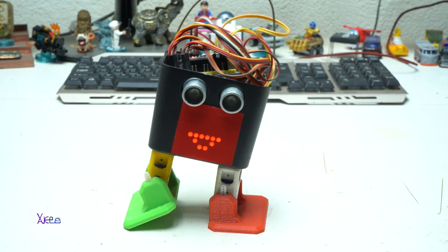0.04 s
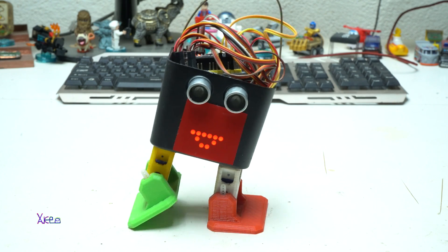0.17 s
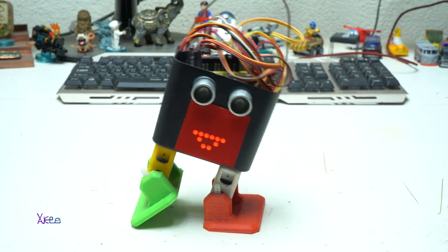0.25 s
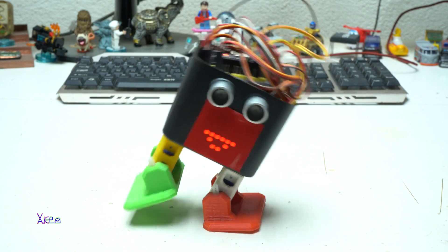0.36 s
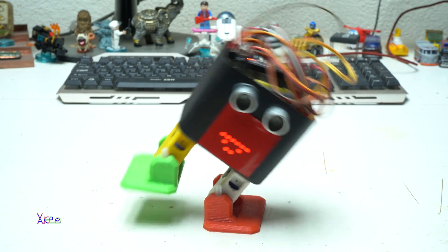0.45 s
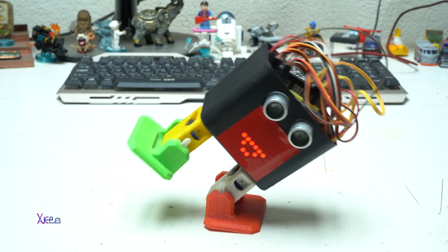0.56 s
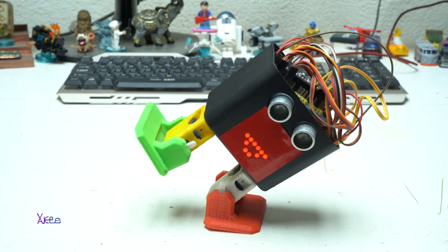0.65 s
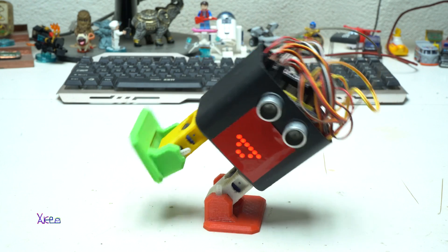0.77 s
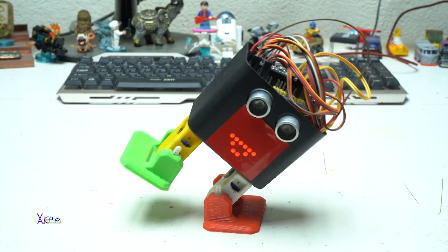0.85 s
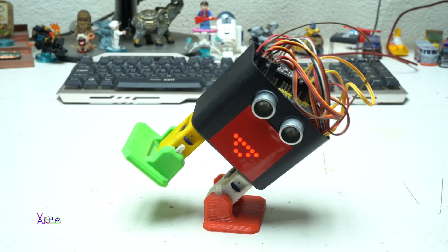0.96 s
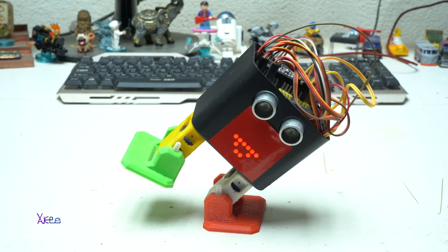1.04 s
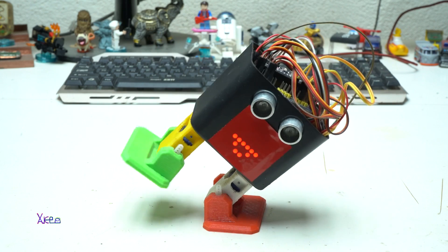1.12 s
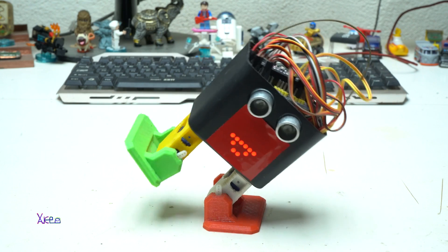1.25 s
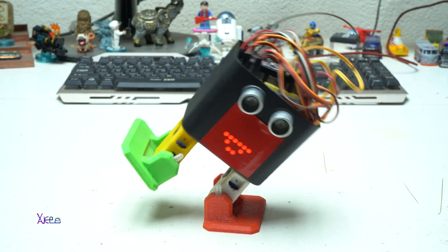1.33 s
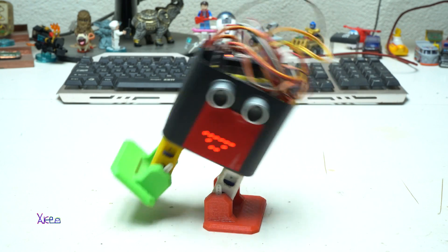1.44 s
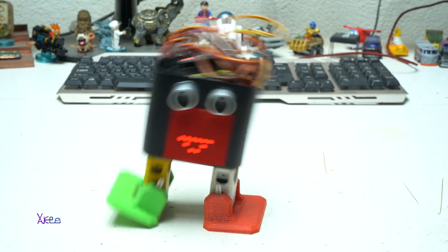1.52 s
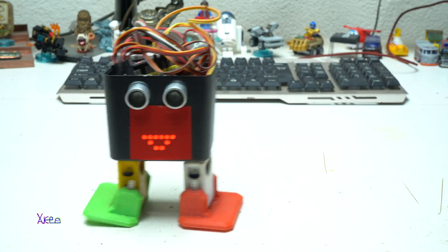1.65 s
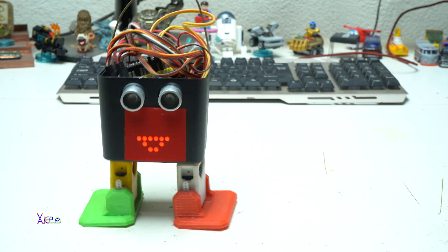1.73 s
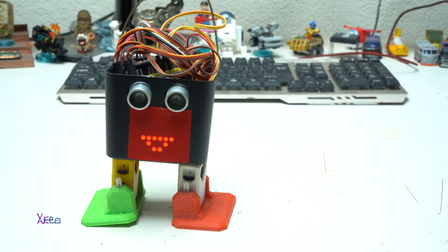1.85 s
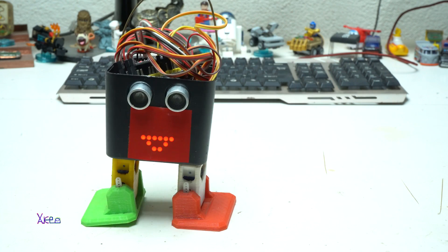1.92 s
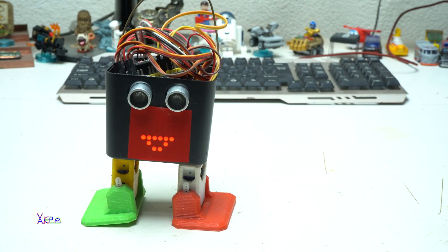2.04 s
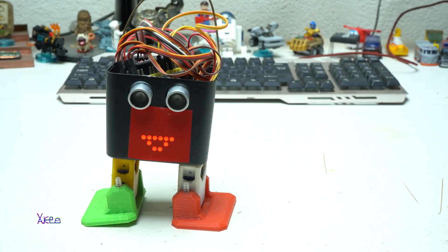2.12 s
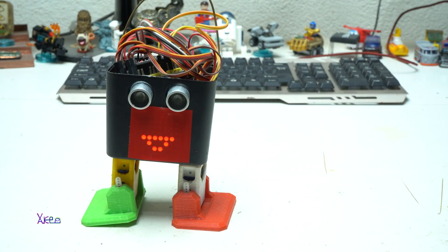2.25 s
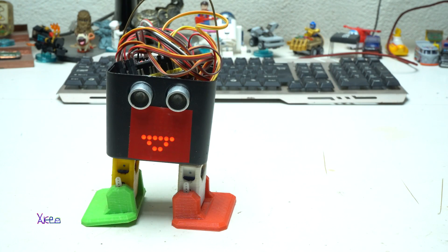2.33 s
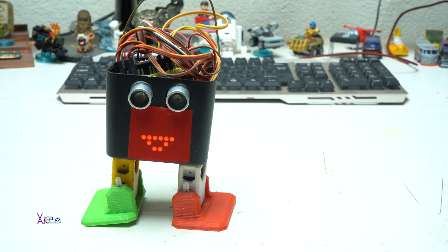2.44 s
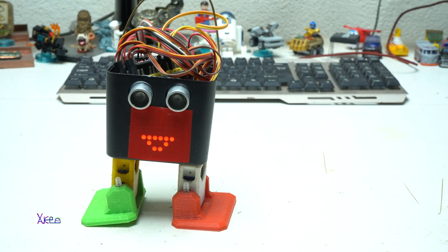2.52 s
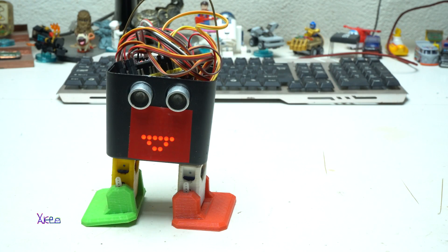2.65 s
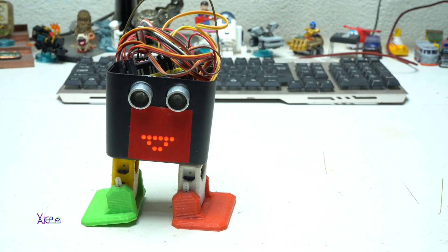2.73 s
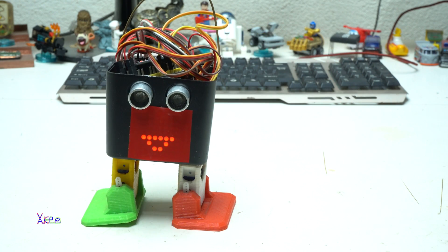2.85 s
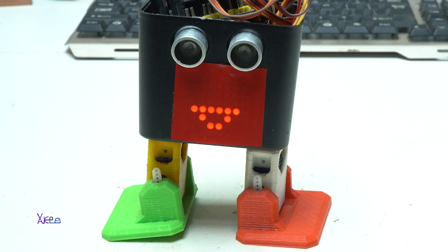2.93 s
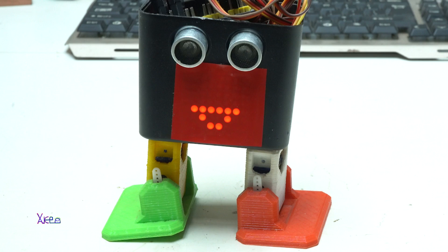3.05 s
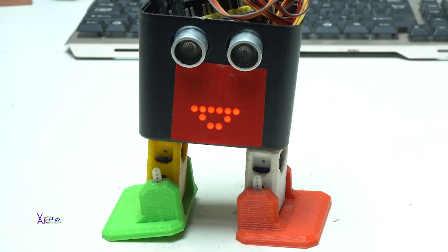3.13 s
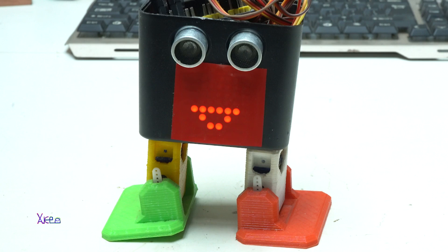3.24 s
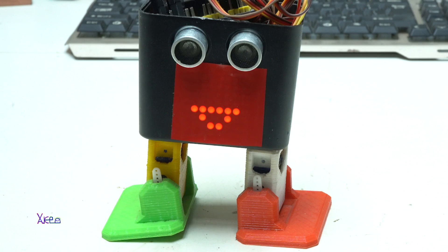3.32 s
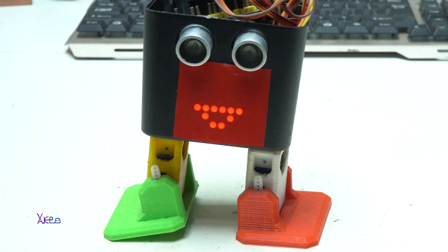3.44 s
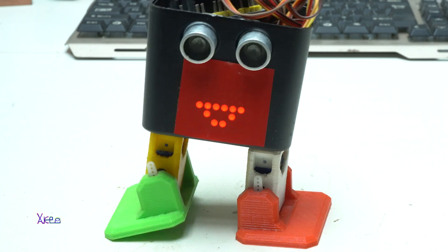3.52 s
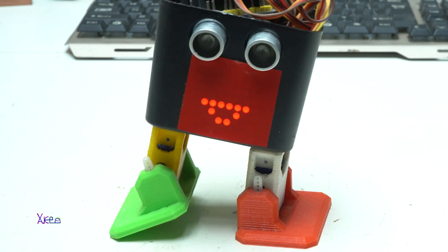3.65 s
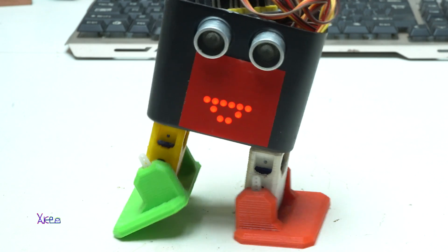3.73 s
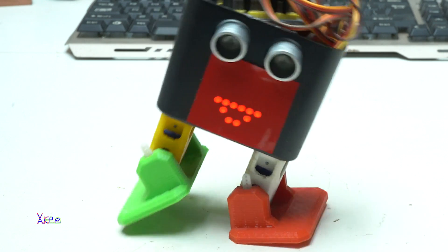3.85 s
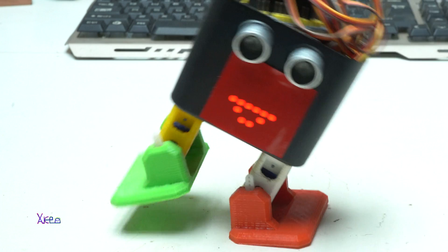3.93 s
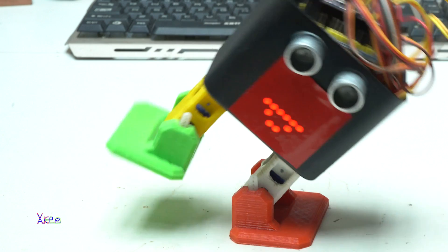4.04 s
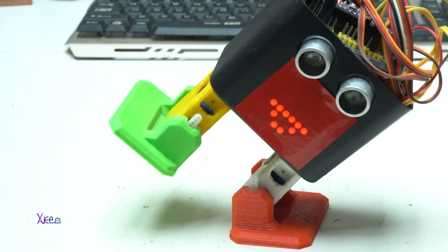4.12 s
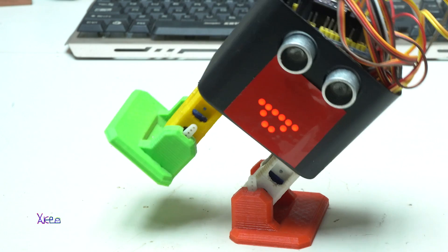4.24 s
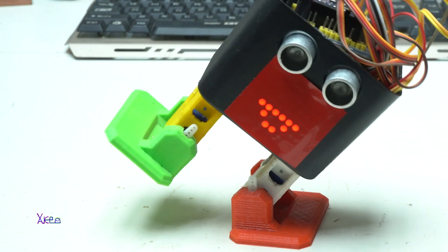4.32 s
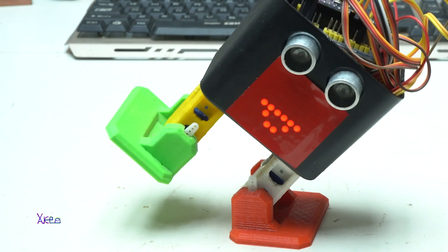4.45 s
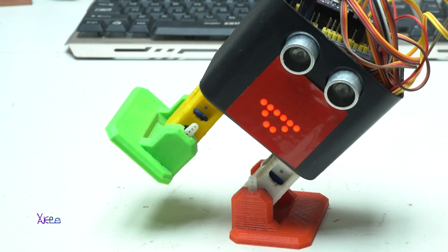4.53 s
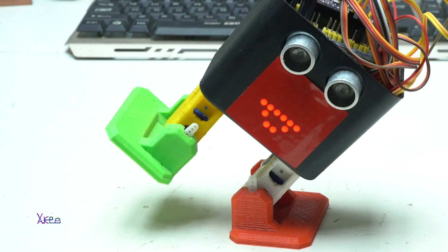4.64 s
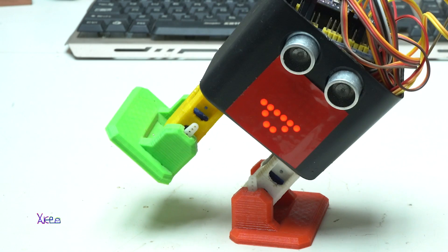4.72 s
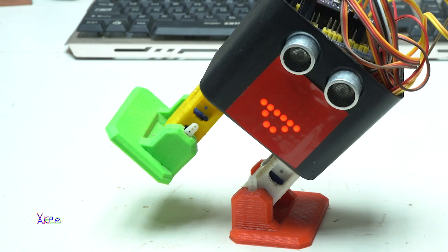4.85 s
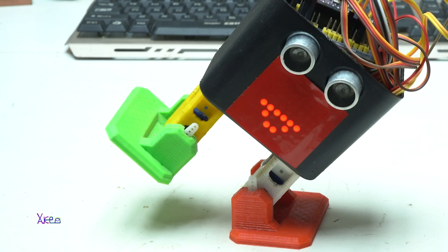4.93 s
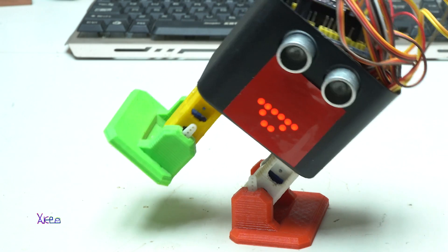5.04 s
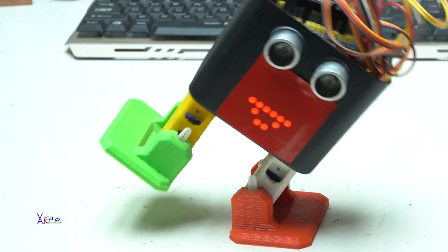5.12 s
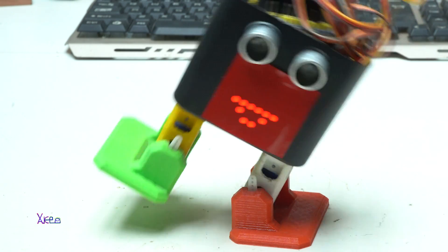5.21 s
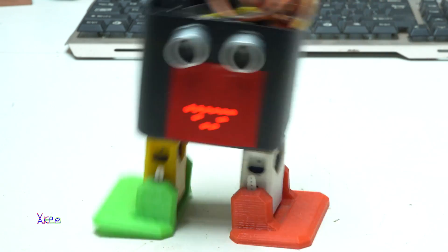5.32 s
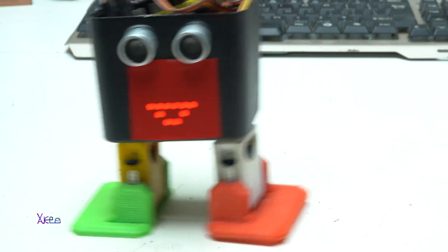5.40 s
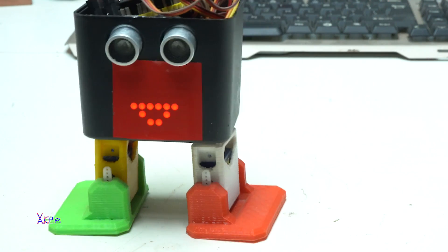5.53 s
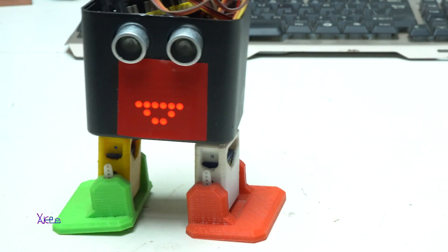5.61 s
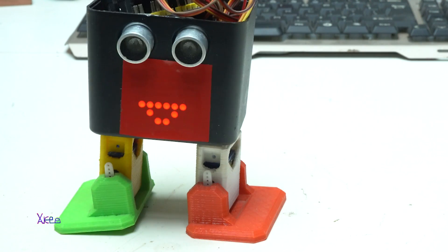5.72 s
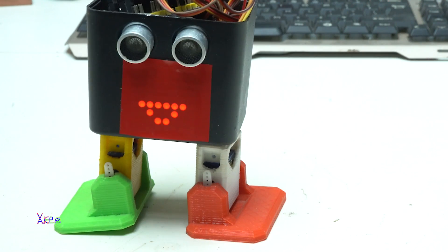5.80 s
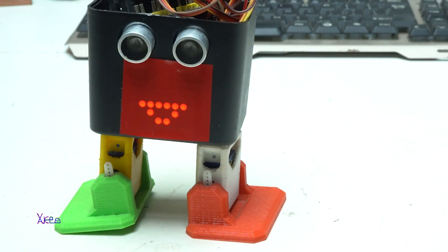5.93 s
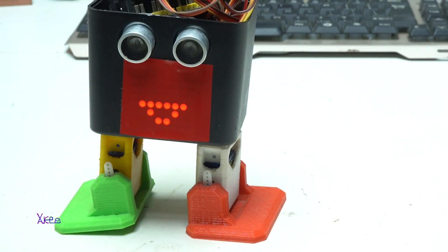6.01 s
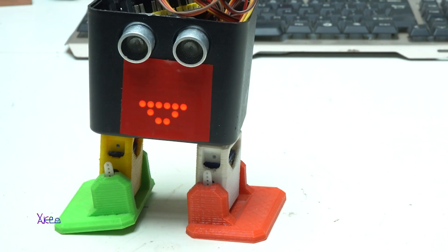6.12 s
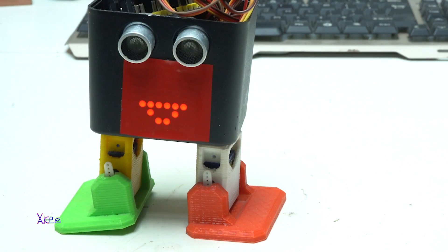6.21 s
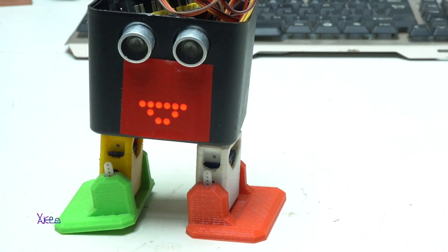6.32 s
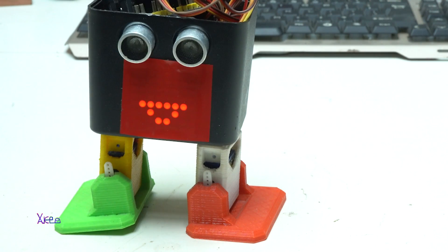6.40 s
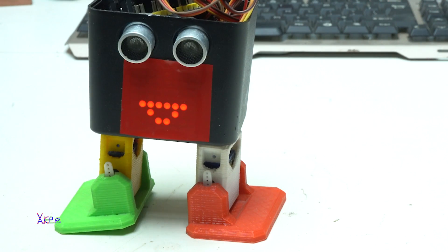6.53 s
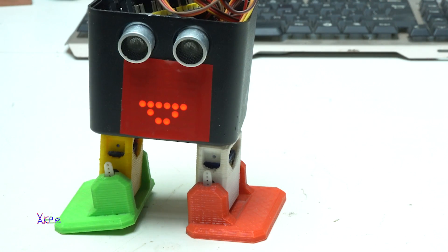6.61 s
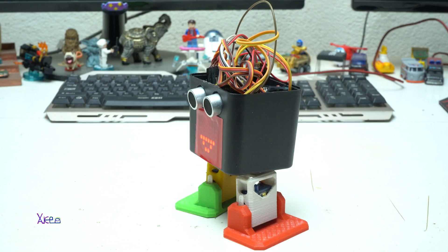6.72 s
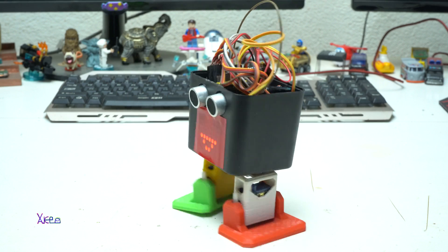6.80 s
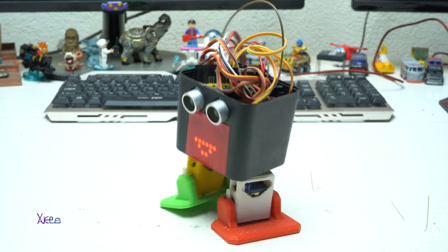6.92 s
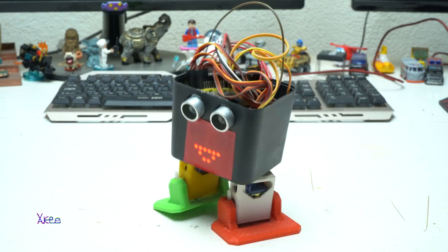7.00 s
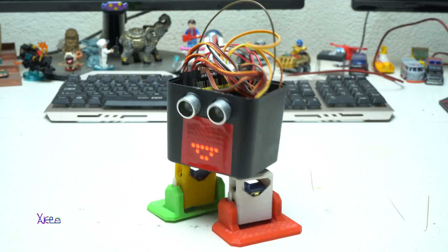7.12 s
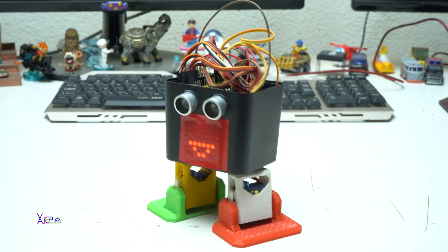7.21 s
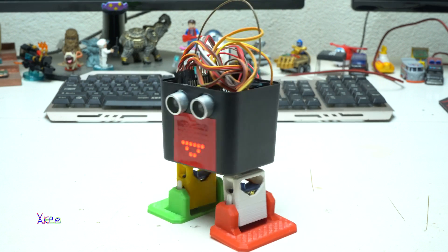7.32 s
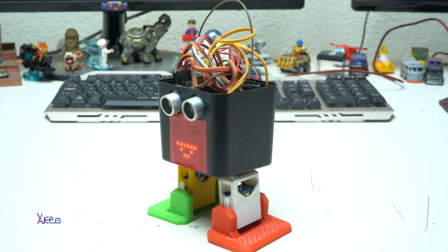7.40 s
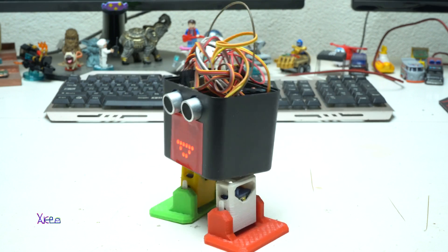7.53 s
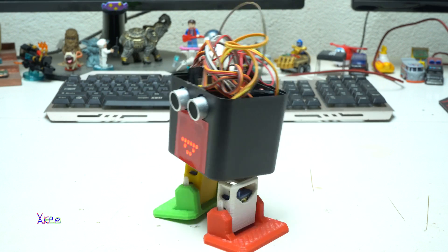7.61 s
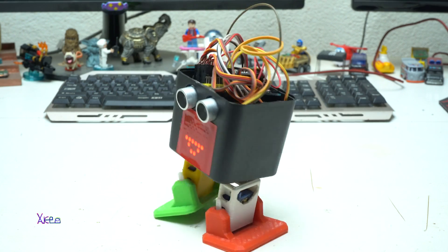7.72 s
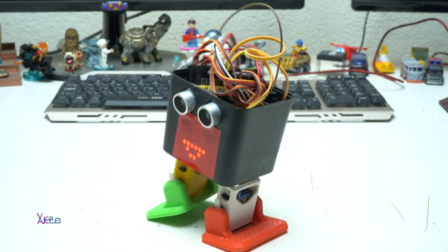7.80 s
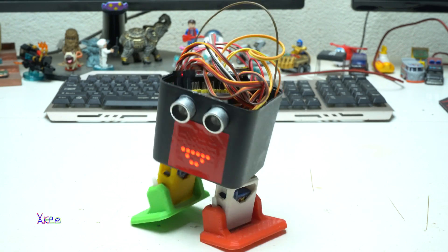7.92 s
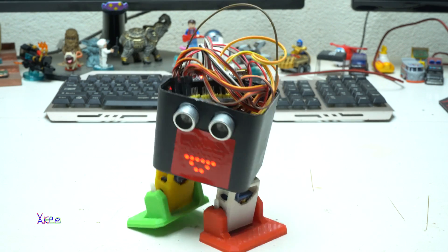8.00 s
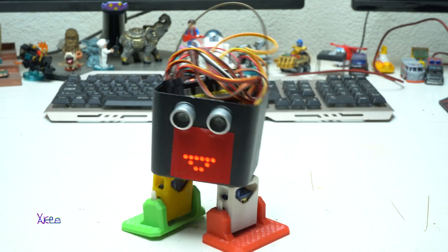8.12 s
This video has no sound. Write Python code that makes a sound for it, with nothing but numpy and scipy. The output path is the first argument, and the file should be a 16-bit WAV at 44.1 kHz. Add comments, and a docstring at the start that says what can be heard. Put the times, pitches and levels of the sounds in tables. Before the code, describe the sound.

A small plastic two-legged robot moves on a desk in a quiet room, heard close in mono with a short tail. A soft gritty creep opens; near 0.3 s two bright gear snaps sound, then raspy servo whirrs rise. From 0.8 to 1.3 s come four quick zips as a foot shakes. A loaded rattle with snaps begins at 1.4, a solid foot clack lands at 1.63, and a short harsh zip follows at 1.72. A faint fifty-per-second buzz lasts until 2.65, with dull low knocks, then near silence. At 3.4 a slow creep grows into a sharp snap at 3.8 and a whirr until 4.25; faint buzzing holds. From 5.15 gears crackle, feet clatter, and the sharpest slap hits at 5.52. Faint buzz fades by 6.1. After quiet, brighter ringing whirrs walk from 6.83 to the end, with a snap and soft dull footfalls.

```python
"""A servo creeps softly in a quiet room: a small plastic two-legged robot on a desk tips a foot, pushes off and leans.
It shakes the lifted foot, drops back, leans again, falls back and at last walks, in a short room tail, in mono.
Servos are random grains and ticks paced by gear turns and fifty drive pulses a second, ringing in the shell.
Backlash snaps and footfalls are impulses broken into rebounds; low knocks are wavering sines.
Stalled servos buzz at the pulse rate, and filtered noise makes the room tone."""
import sys
import numpy as np
from scipy import signal
from scipy.fft import rfft, irfft
from scipy.io import wavfile

SR = 44100
rng = np.random.default_rng(int(sys.argv[2]) if len(sys.argv) > 2 else 0)


def put_to_file(sound):
    """Save the sound as 16-bit audio at rate SR, in the file named by the first command-line argument."""
    columns = np.atleast_2d(sound).T  # one column per channel
    safe = np.clip(columns, -1, 1)
    whole_steps = np.round(safe * 32767)
    wavfile.write(sys.argv[1], SR, whole_steps.astype(np.int16))


N = 359856
TIME = np.arange(N) / SR

# All level_db columns are relative: later gains, filters and resonances shift them.

# Servo strokes: tip, push off and lean; four shakes of the lifted foot; drop back and straighten;
# tip and lean again; swing back, fall and straighten; walk.
# Columns: start_s, rise_s, driven_length_s, coast_decay_s, top_speed_turns_per_s,
#          rattle_level_db, whirr_level_db, tick_level_db, load_on_rough_tooth (0-1)
SERVO_STROKES = [ (0, .01, 0.22, 0.034, 56, -41.5, -54.5, -49.5, 0.04),
                 (0.272, 0.051, .065, .075, 150, -27.5, -63, -32, 0.28),
                 (.41, .08, 0.19, 0.026, 136, -36, -44, -33, .3),
                 (0.519, .075, .265, .018, 140, -34, -38.5, -32, 0.55),
                 (0.807, .08, .13, .02, 180, -31, -36, -34, .41),
                 (0.964, 0.043, .055, 0.02, 110, -35.5, -40.5, -33.5, .43),
                 (1.049, .06, .08, 0.009, 165, -33, -37.5, -35, .45),
                 (1.147, .06, .15, 0.037, 165, -33, -37.5, -32.5, .45),
                 (1.414, 0.27, .225, 0.037, 135, -27, -46, -34, 0.5),
                 (1.718, .045, .07, 0.026, 190, -26, -35, -28, .44),
                 (3.42, .21, 0.37, 0.037, 80, -41, -51.5, -51.5, 0.3),
                 (3.812, 0.038, .06, 0.065, 146, -27, -46.5, -32.5, .4),
                 (3.929, .19, .305, 0.025, 140, -34, -39.5, -32.5, .34),
                 (5.199, 0.14, .17, 0.034, 85, -32.5, -53.5, -45, 0.8),
                 (5.348, .06, .09, .03, 135, -26.5, -44.5, -35.5, .6),
                 (5.549, .04, .05, .04, 90, -32.5, -55, -39.5, 0.38),
                 (6.831, .07, .14, .13, 160, -27.5, -39.5, -33, .3),
                 (7.152, 0.058, .11, 0.099, 110, -34, -44, -36.5, 0.13),
                 (7.27, .17, .22, 0.088, 160, -30, -36.5, -38, .22),
                 (7.564, 0.092, 0.25, 0.055, 67, -36, -48.5, -47, .2),
                 (7.755, 0.15, 0.34, 0.107, 120, -31, -42, -38, .15)]
# Gears jumping across their play. Columns: start_s, level_db
BACKLASH_SNAPS = [(0.2753, -22), (0.2936, -17), (1.4353, -27.5), (1.4503, -19.5), (1.4656, -28.5),
                  (1.48, -19.5), (1.7198, -16), (1.729, -17.5), (3.8182, -15), (4.4085, -38),
                  (5.1595, -25.5), (5.194, -27.5), (5.216, -21.5), (5.2385, -24), (5.255, -25.5),
                  (5.2804, -23.5), (5.2963, -19), (6.8471, -19.5)]
# A foot meets the desk, or a loose part taps the shell.
# Columns: start_s, level_db, brightness_hz (half the low-pass corner, which is held below SR / 3)
FOOTFALLS = [(0.291, -34.5, 1190), (0.847, -41.5, 600), (1.635, -15, 2500), (1.776, -25.5, 3500),
             (4.055, -47, 903), (4.262, -50, 1473), (4.409, -53, 4000), (5.433, -21, 3483),
             (5.511, -29, 2466), (5.525, -23, 2910), (5.591, -28.5, 1790), (6.865, -40, 1186),
             (7.029, -36, 900), (7.271, -38, 601), (7.593, -45, 453.3)]
# A hard edge of a foot slaps down. Columns: start_s, level_db
EDGE_SLAPS = [(1.635, -17), (5.5242, -5.5)]
# Soft knocks through the furniture. Columns: start_s, level_db, pitch_hz, waver_hz, t60_s
FURNITURE_KNOCKS = [(2.455, -44, 300, 100, 0.39), (2.455, -47, 524, 73, 0.26), (2.52, -60, 397, 14, 1.7),
                    (2.812, -43, 104.4, 15, 0.11), (2.829, -47.5, 38.3, 4.7, 1.8), (1.6, -44, 44, 9.8, 1.1),
                    (5.45, -45.5, 43, 4.7, 1.46), (6.71, -58.5, 486, 23.7, 0.47)]
# A stalled servo holds a pose. Columns: start_s, length_s, twitch_level_db, shudder_level_db
POSE_HOLDS = [(1.872, 0.79, -57, -60.5), (4.283, 0.29, -58, -62), (4.57, 0.62, -61.5, -64.5),
              (5.053, 0.099, -54, -59), (5.687, 0.17, -53, -59), (5.838, 0.27, -58.5, -59.5)]
# Gaps between the rebounds of loose plastic parts, scaled for each kind of blow. Column: gap_s
REBOUND_GAPS = [.00037, .00083, .00131, .00197, .00289]

# Broad spectra, each for one kind of sound. Columns: frequency_hz, level_db (per Hz)
GEAR_SPECTRUM = [(400, -25), (850, -25), (1500, -20), (2300, -19), (3200, -16), (3900, -0.5), (5000, 2),
                 (6500, -1), (8200, -7), (12000, -18), (16000, -27.5)]
MOTOR_SPECTRUM = [(200, -30), (1000, -37.5), (1270, -2), (1700, -1.5), (2300, -6.5), (2950, -2.5),
                  (3350, 7.5), (4200, -9), (16000, -25.5)]
TOOTH_SPECTRUM = [(2000, -25.5), (6000, -11.5), (8200, -2.5), (9200, 0.5), (10600, -1.5), (12000, -3.5),
                  (13400, -6), (14700, -24.5), (16000, -34)]
BUZZ_SPECTRUM = [(800, -17), (2400, -22.5), (3300, -15), (3900, -7), (5400, -7.5), (6500, -14.5),
                 (10500, -24.5), (15000, -30)]
FOOT_SPECTRUM = [(60, -27.5), (110, -14.5), (200, -10.5), (330, -13.5), (700, -7), (1300, -8.5),
                 (2200, -10), (4200, -7.5), (13000, -30.5)]
EDGE_SPECTRUM = [(700, -26), (2000, -15), (3400, -27), (4300, 10), (5000, -9), (6000, 6), (7500, -6.5),
                 (12000, -18.5), (16000, -28.5)]
ROOM_SPECTRUM = [(13, -32.5), (22, -2), (59, -8.5), (97, -2), (132, -12), (242, -15), (457, -22),
                 (569, -20), (1230, -27), (16000, -38)]

# Resonances of the shell and servo cases. Columns: pitch_hz, width_hz, lift_db
SHELL_MODES = [(396, 30, 2.5), (568, 16, 7), (853.6, 20, 10), (918, 30, 4.5), (1130, 32, 8.5),
               (1203, 34.7, 5), (1473, 21, 7.5), (2010, 29, 4.5), (3736, 47, 4), (4250, 30, 6.5),
               (4295, 28, 1.5), (7700, 460, 2.5), (8230, 200, -4.5), (8850, 270, 5)]
# Resonances of the hip servos, heard in the walk. Columns: pitch_hz, width_hz, lift_db
HIP_MODES = [(2614, 185, 17), (3870, 60, 22), (4930, 240, 29.5)]
# Notes that a stalled servo keeps ringing. Columns: pitch_hz, width_hz, lift_db
STALL_MODES = [(3890, 110, 5), (4540, 70, 7), (5230, 90, 5)]

FRAME_HZ, FRAME_START_S = 50, .0105  # drive pulses
CREEP_TURNS_PER_S = 50  # a creeping gear turns about once per drive pulse
# the amplitude of each sound grows as this power of the stroke's pace
RATTLE_POWER, WHIRR_POWER, TICK_POWER = 0.67, 0.92, 1.14
WALK_START_S = 6.5
HOLD_RISE_S, HOLD_DECAY_S = 0.0092, .018
ROOM_DB = -56
CUTOFF_HZ = 15900


def from_db(db):
    """Amplitude factor of a level in decibels."""
    return 10 ** (np.asarray(db) / 20)


def rms_one(x):
    """Scales a signal to an rms of 1."""
    return x / np.sqrt(np.mean(x ** 2) + 1e-20)


def convolve(x, response):
    """Rings a response with a signal, cut to the scene's length."""
    return signal.fftconvolve(x, response)[:N]


def drift(rate_hz):
    """Straight lines between random knots of spread 1."""
    knots = rng.standard_normal(4000)
    return np.interp(TIME * rate_hz, np.arange(len(knots)), knots)


def body(spectrum, modes=(), size=8192):
    """Minimum-phase response of unit energy: a broad spectrum with narrow resonances on top."""
    hz = np.arange(size // 2 + 1) * SR / size + 1e-3
    points = np.array(spectrum)
    db = np.interp(np.log(hz), np.log(points[:, 0]), points[:, 1])
    for pitch_hz, width_hz, lift_db in modes:
        db = db + lift_db / (1 + ((hz - pitch_hz) / width_hz) ** 2)
    # folding the cepstrum forward in time makes the response causal
    cepstrum = irfft(np.log(from_db(db)))
    cepstrum[1:size // 2] *= 2
    cepstrum[size // 2 + 1:] = 0
    response = irfft(np.exp(rfft(cepstrum)))
    return response / np.linalg.norm(response)


def uneven_strengths(count, spread_db):
    """Random amplitudes, spread in decibels and kept within two spreads."""
    return from_db(spread_db * np.clip(rng.standard_normal(count), -2, 2))


def grains(per_s, spread_db):
    """Dense tiny impacts of uneven size and either sign; rms 1."""
    sizes = uneven_strengths(N, spread_db) * rng.choice([-1, 1], N)
    hits = rng.random(N) < per_s / SR
    return rms_one(sizes * hits)


def pulses(turns, rate, decay_s, spread_db):
    """Envelope of one decaying burst per turn, each of its own strength; rms 1."""
    strengths = uneven_strengths(4000, spread_db)
    strength = strengths[np.floor(turns).astype(int) % len(strengths)]
    age_s = (turns % 1) / rate
    return rms_one(strength * np.exp(-age_s / decay_s) / np.sqrt(rate))


def blend(share, envelope):
    """Envelope of a steady flow with a share of its power in bursts."""
    share = np.clip(share, 0, 1)
    return np.sqrt(1 - share + share * envelope ** 2)


def swell(start_s, rise_s, length_s, decay_s):
    """Rises evenly to 1, stays while driven, then dies away."""
    age_s = TIME - start_s
    return np.clip(age_s / rise_s, 0, 1) * np.exp(-np.clip((age_s - length_s) / decay_s, 0, 20))


def burst(start_s, decay_s):
    """Envelope that starts at once and dies away."""
    return (TIME >= start_s) * np.exp(-np.clip((TIME - start_s) / decay_s, 0, 20))


def clicks(rows):
    """One impulse for each start_s, level_db."""
    out = np.zeros(N)
    for start_s, level_db in rows:
        out[int(start_s * SR)] += from_db(level_db)
    return out


def rebound(x, scale, feedback):
    """Chained allpass filters break a blow into a quick run of rebounds, with its spectrum unchanged."""
    for gap_s in REBOUND_GAPS:
        delay = np.zeros(max(int(gap_s * scale * SR), 1))
        x = signal.lfilter(np.r_[feedback, delay, 1], np.r_[1, delay, feedback], x + 1e-18)
    return x


def strokes():
    """Gives speed, load and three gains: overlaps add in power, the fastest sets the beat, pace weights the load."""
    speed, power = CREEP_TURNS_PER_S, 1e-18
    weighted_load, weight = 0, 1e-18
    for start_s, rise_s, length_s, decay_s, top_speed, rattle_db, whirr_db, tick_db, load in SERVO_STROKES:
        pace = swell(start_s, rise_s, length_s, decay_s)
        stroke_speed = CREEP_TURNS_PER_S + (top_speed - CREEP_TURNS_PER_S) * pace
        speed = np.maximum(speed, stroke_speed)
        gains = [from_db(rattle_db) * pace ** RATTLE_POWER,
                 from_db(whirr_db) * pace ** WHIRR_POWER,
                 from_db(tick_db) * pace ** TICK_POWER]
        power = power + np.square(gains)
        weighted_load = weighted_load + load * pace
        weight = weight + pace
    return speed, np.clip(weighted_load / weight, 0, 1), np.sqrt(power)


def servos():
    """Slow servos move in kicks, one per drive pulse; fast ones run through, and the turning gear marks the beat."""
    speed, load, (rattle_gain, whirr_gain, tick_gain) = strokes()
    speed = speed * from_db(0.22 * drift(60))
    turns = np.cumsum(speed) / SR
    slowness = FRAME_HZ / speed
    kicks = pulses((TIME - FRAME_START_S - .002) * FRAME_HZ, FRAME_HZ, decay_s=.004, spread_db=1.2)
    lurch = pulses(turns, speed, decay_s=.003, spread_db=1.5)
    tooth = pulses(turns, speed, decay_s=.0011, spread_db=.8)
    drive = blend(.3 * (1 - load) * slowness, kicks)
    rattle = grains(per_s=10000, spread_db=6.0) * drive * blend(load * slowness + 0.23, lurch) * rattle_gain
    whirr = grains(per_s=12000, spread_db=2.0) * blend(0.66 * load, lurch) * whirr_gain * from_db(2.5)
    # the tooth's tick rings a high note of the case; the rest of the gear only rasps
    ticks = rng.choice([-1, 1], N) * tooth * np.sqrt(load) * tick_gain
    rasp = grains(per_s=9000, spread_db=2.5) * drive * np.sqrt(1 - load) * tick_gain
    # the kicks of a slow servo also jolt the legs and shell
    jolts = rattle * from_db(-10.5) * (1 - load) * slowness ** 2
    # the hips ring the more, the faster they swing
    hips = (TIME > WALK_START_S) * np.clip(speed / 160, 0, 1)
    return (convolve(rattle, body(GEAR_SPECTRUM, SHELL_MODES))
            + convolve(whirr * (1 - hips), body(MOTOR_SPECTRUM, SHELL_MODES))
            + convolve(whirr * hips * from_db(3.5), body(MOTOR_SPECTRUM, SHELL_MODES + HIP_MODES))
            + convolve(ticks * from_db(2.0), body(TOOTH_SPECTRUM, [(10770, 470, 6)]))
            + convolve(rasp, body(TOOTH_SPECTRUM, SHELL_MODES))
            + convolve(jolts, body(FOOT_SPECTRUM, SHELL_MODES)))


def room_tone():
    """Steady air of the quiet room: white noise shaped by a broad spectrum and one low resonance."""
    noise = rng.standard_normal(N)
    return from_db(ROOM_DB) * rms_one(convolve(noise, body(ROOM_SPECTRUM, [(115, 9.5, 4.9)])))


def room(x, low_t60_s, high_t60_s, split_hz, wet_db):
    """Adds the diffuse tail of a small room to the direct sound; the treble dies first."""
    t = TIME[:SR]
    noise = rng.standard_normal(SR)
    low = signal.lfilter(*signal.butter(1, split_hz, fs=SR), noise)
    high = noise - low
    tail = low * from_db(-60 * t / low_t60_s) + high * from_db(-60 * t / high_t60_s)
    tail = tail * (t > .003)
    return x + from_db(wet_db) * convolve(x, tail / np.linalg.norm(tail))


def backlash():
    """Single hard snaps of tooth on tooth, each a short run of rebounds ringing in gears and shell."""
    snap = rebound(signal.unit_impulse(2048), scale=.12, feedback=.5)
    snaps = convolve(clicks(BACKLASH_SNAPS), snap) * from_db(12.0)
    ring = 0.83 * body(GEAR_SPECTRUM, SHELL_MODES) + 0.59 * body(TOOTH_SPECTRUM, SHELL_MODES)
    return convolve(snaps, ring)


def feet():
    """A landing rebounds and shakes every loose part for some milliseconds; soft landings are duller."""
    run = rebound(signal.unit_impulse(4096), scale=.8, feedback=0.79)
    clatter = grains(per_s=9000, spread_db=1.5)
    blows = np.zeros(N)
    for start_s, level_db, brightness_hz in FOOTFALLS:
        start = int(start_s * SR)
        push = run + from_db(-23) * clatter[:4096] * np.exp(-TIME[:4096] / 0.0064)
        clatter = np.roll(clatter, 4096)  # fresh grains for the next landing
        lowpass = signal.butter(1, min(2 * brightness_hz, SR / 3), fs=SR)
        push = signal.lfilter(*lowpass, push)[:N - start]
        blows[start:start + len(push)] += from_db(level_db + 26.0) * push
    slap = rebound(signal.unit_impulse(4096), scale=0.55, feedback=0.76)
    slaps = convolve(clicks(EDGE_SLAPS), slap) * from_db(16.5)
    return (convolve(blows, body(FOOT_SPECTRUM, SHELL_MODES))
            + convolve(slaps, body(EDGE_SPECTRUM, [(4527, 65, 10.0)])))


def knocks():
    """Faint low bumps that swell and ring on unsteadily; the lowest are the slow wobble of the desk."""
    out = np.zeros(N)
    for start_s, level_db, pitch_hz, waver_hz, t60_s in FURNITURE_KNOCKS:
        phase = 2 * np.pi * np.cumsum(pitch_hz + waver_hz * drift(2 * waver_hz)) / SR
        decay_s = t60_s / np.log(1000)
        envelope = burst(start_s, decay_s) - burst(start_s, decay_s / 4)
        out += from_db(level_db + 5.5) * envelope * np.sin(phase)
    return out


def holding():
    """Each drive pulse twitches the stalled motor: a tick, then a shudder that lasts almost to the next pulse."""
    frames = (TIME - FRAME_START_S) * FRAME_HZ
    twitch = pulses(frames - .02, FRAME_HZ, decay_s=.0025, spread_db=1.1)
    shudder = pulses(frames - .2, FRAME_HZ, decay_s=.012, spread_db=.6)
    # the same teeth meet on every pulse, so part of the rattle repeats
    same_teeth = np.resize(rng.choice([-1, 1], SR // FRAME_HZ), N)
    contact = same_teeth + .6 * rng.choice([-1, 1], N)
    effort = np.zeros(N)
    for start_s, length_s, twitch_db, shudder_db in POSE_HOLDS:
        strain = from_db(twitch_db) * twitch + from_db(shudder_db) * shudder
        effort = np.maximum(effort, swell(start_s, HOLD_RISE_S, length_s, HOLD_DECAY_S) * strain)
    return convolve(rms_one(contact) * effort * from_db(-0.5), body(BUZZ_SPECTRUM, STALL_MODES))


def scene():
    """Motors and feet each get their own room tail; knocks and room tone stay dry."""
    motors = room(servos() + backlash() + holding(),
                  low_t60_s=0.37, high_t60_s=0.06, split_hz=4600, wet_db=-13)
    steps = room(feet(), low_t60_s=0.29, high_t60_s=0.058, split_hz=3900, wet_db=-7.5)
    return (from_db(-1.5) * motors + steps + knocks() + room_tone())[None]


def record(dry):
    """One microphone channel whose top is cut steeply by an elliptic low-pass."""
    lowpass = signal.ellip(12, .1, 70, CUTOFF_HZ, fs=SR, output="sos")
    return signal.sosfilt(lowpass, dry)


dry = scene()
out = record(dry)
put_to_file(out)
```